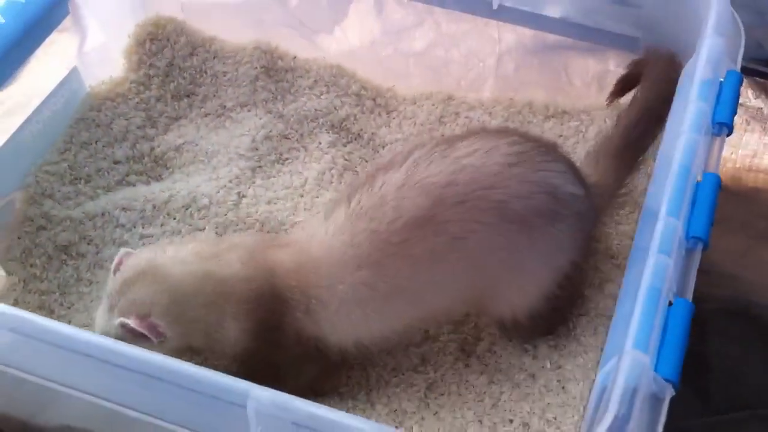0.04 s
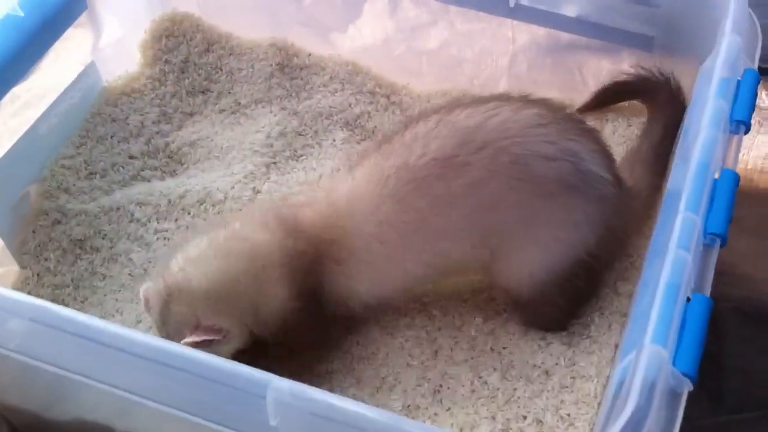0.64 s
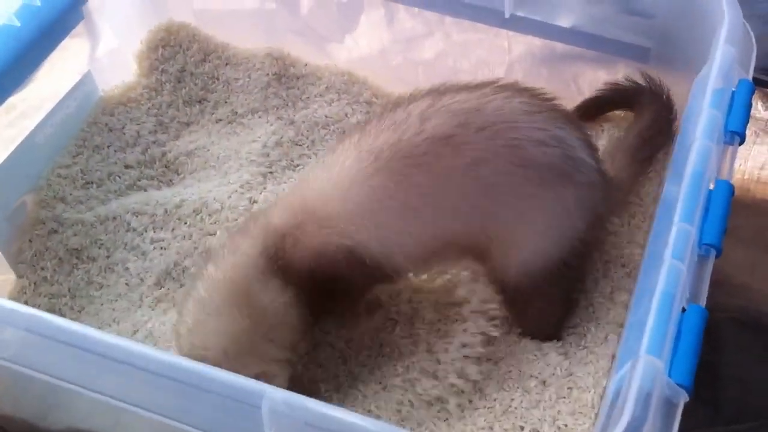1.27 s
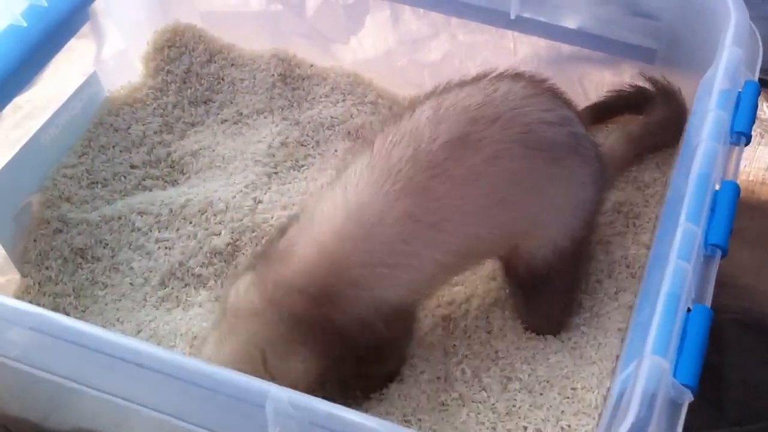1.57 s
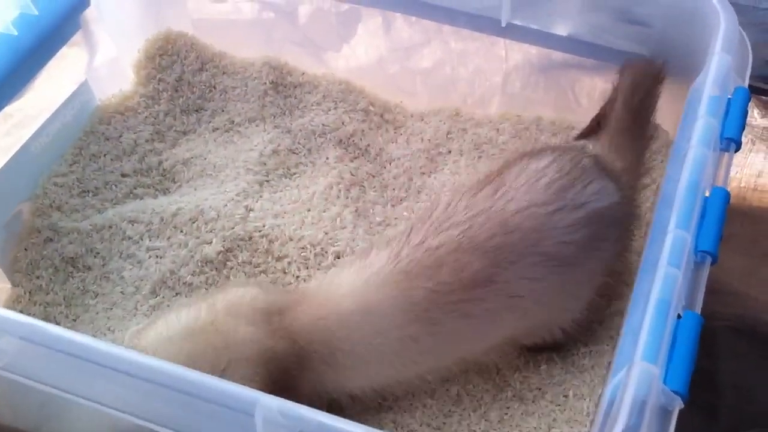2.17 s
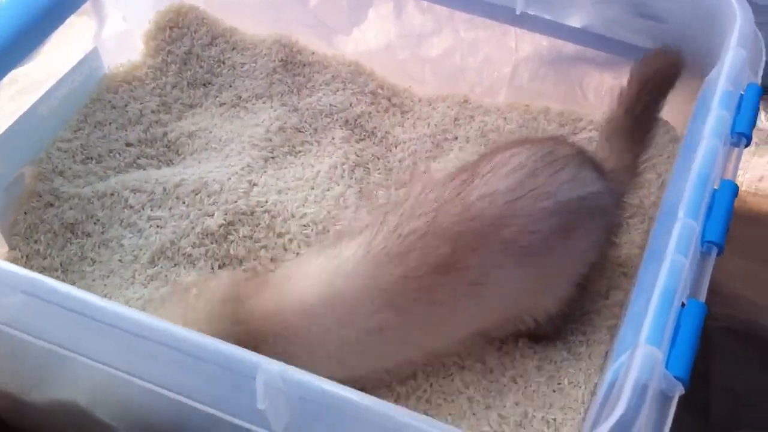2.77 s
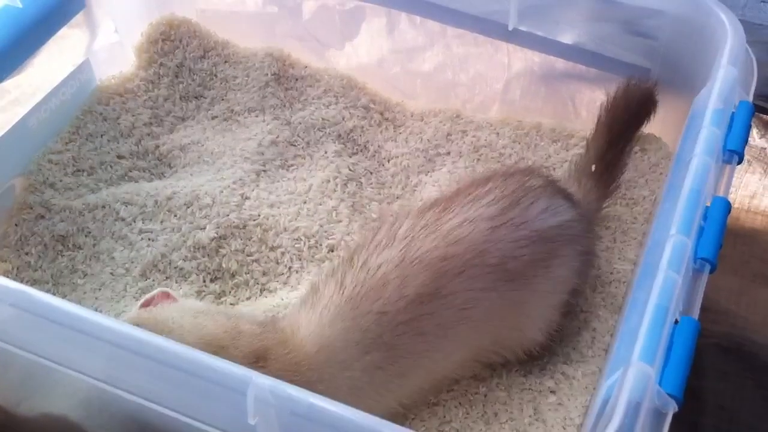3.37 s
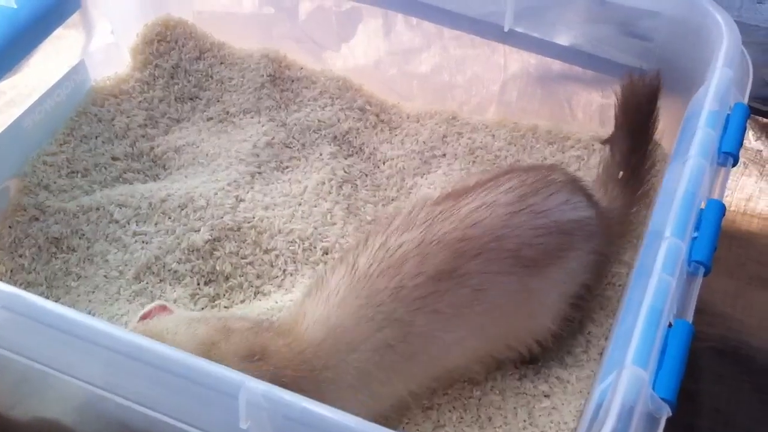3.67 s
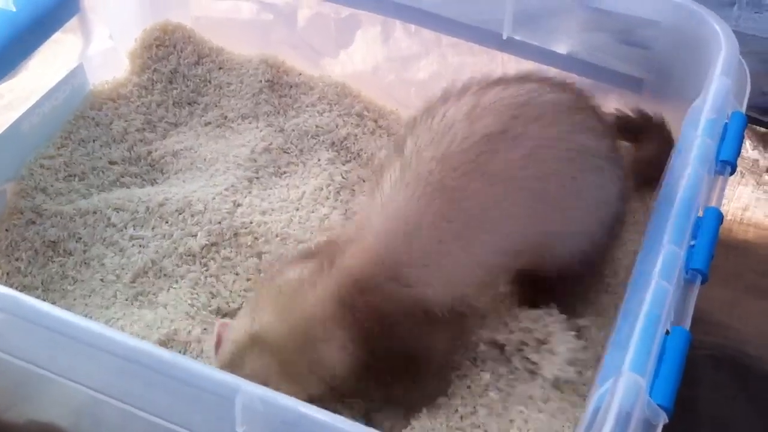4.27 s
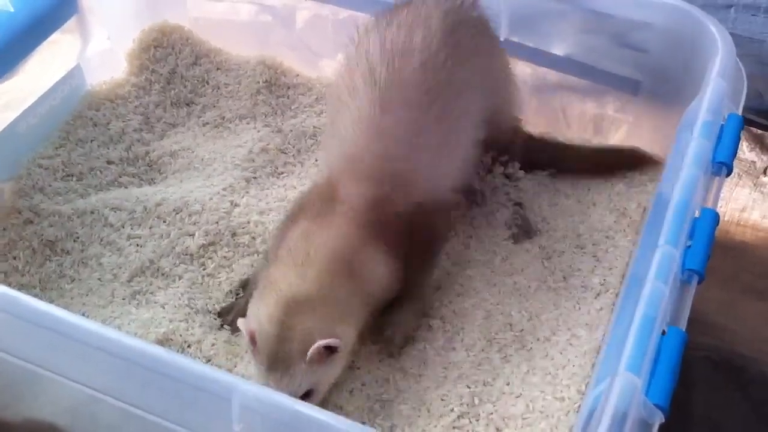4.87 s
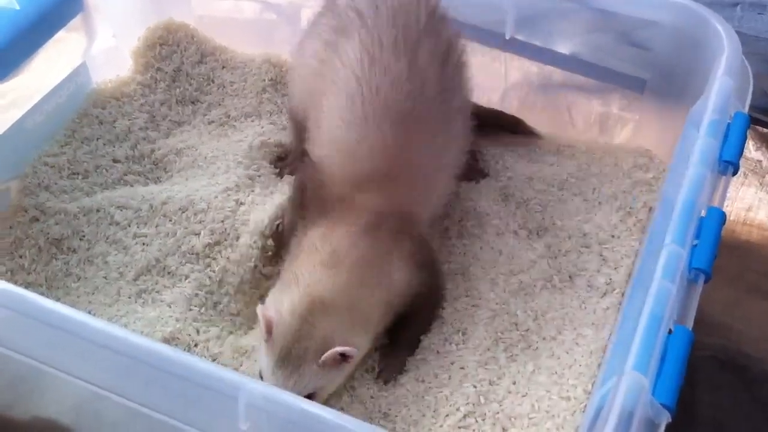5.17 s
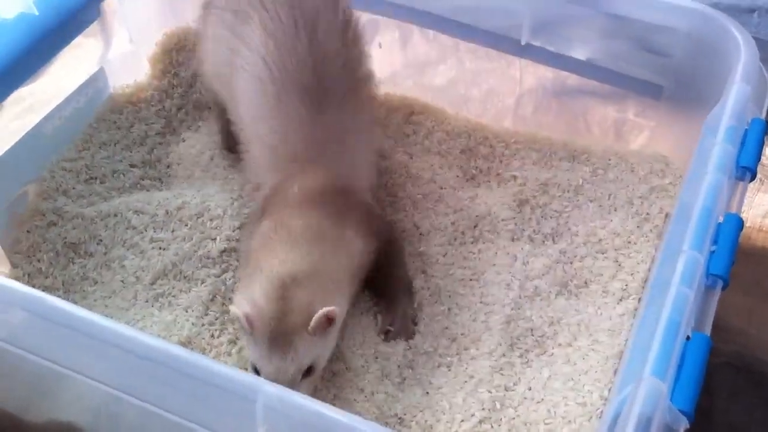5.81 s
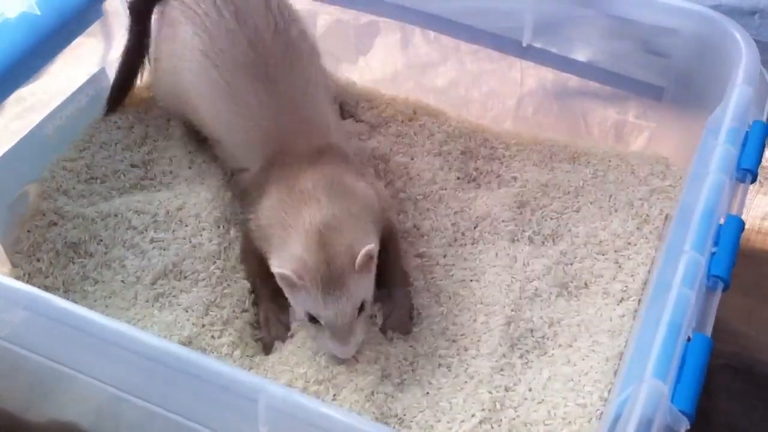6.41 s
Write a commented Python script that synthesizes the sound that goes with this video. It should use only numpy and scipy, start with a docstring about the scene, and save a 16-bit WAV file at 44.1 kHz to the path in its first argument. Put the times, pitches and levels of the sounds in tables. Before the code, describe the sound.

A ferret digs in a plastic tub of dry rice, heard up close in a small room with a faint, steady, low appliance drone. It opens with a short spatter of grains and a click on the plastic. From 0.5 to 1.8 seconds, quick, light paw strokes make a soft, fizzy rustle, with a small scatter at 1.5. Sharp ticks cluster near 1.8 seconds, then the snout shoves deeper in uneven, hollow crunches with stray ticks. At 3.2 seconds comes the loudest sound, a bright spray of rice pelting the tub wall, followed by grains pattering down and a couple of clicks. Rustling resumes at 4 seconds, with another spray near 4.5 and a few ticks. Paw strokes continue with a small scatter at 5.5, a stronger, boxier spray on the far wall at 5.9, and a last light scatter around 6.3 seconds.

```python
"""A ferret digs in a plastic tub of dry rice, close by, in a small room with a droning appliance.
Its paws stir the surface into a fine fizz and its snout churns deeper down with a hollow crunch.
Each kick flings a spray of grains against the tub's walls, and stray grains tick on the plastic.
All the rice is made of tiny collisions, coloured by the wall or the layer where they happen."""
import sys
import numpy as np
from scipy import signal
from scipy.fft import rfft, irfft
from scipy.io import wavfile

SR = 44100
rng = np.random.default_rng(int(sys.argv[2]) if len(sys.argv) > 2 else 0)


def dump_mix(stems):
    """Bounce the given channels to the path in sys.argv[1] as a 16-bit WAV at rate SR."""
    frames = np.atleast_2d(stems).T  # one column per channel
    limited = np.clip(frames, -1, 1)  # hard clip at full scale
    pcm = np.round(limited * 32767).astype(np.int16)
    wavfile.write(sys.argv[1], SR, pcm)


N = 284445

# bright tone of grains on the tub's near wall: (frequency [Hz], relative level [dB])
NEAR_WALL = [(50, -34), (180, -6.5), (500, -17.5), (780, -13.5), (1200, -14.5), (1800, 1), (2900, 0.5),
             (4000, -3.5), (5200, -5), (6400, 2), (10000, 0), (12500, 3), (15800, 2)]


def gain_of(db):
    """Decibels to amplitude."""
    return 10 ** (np.asarray(db) / 20)


def unit_rms(x):
    """Scales to rms 1."""
    return x / np.sqrt(np.mean(x ** 2) + 1e-20)


def curve_at(points, hz):
    """Reads a curve on a log-frequency axis."""
    f, value = np.transpose(points)
    return np.interp(np.log(hz + 1), np.log(f + 1), value)


def add(mix, start, sound):
    """Mixes a sound in, start seconds from the top."""
    part = mix[round(start * SR):][:len(sound)]
    part += sound[:len(part)]


def wander(hz):
    """Smooth random drift of rms 1, its speed rolling off around hz."""
    f = np.fft.rfftfreq(N, 1 / SR)
    return unit_rms(irfft(rfft(rng.standard_normal(N)) * np.exp(-(f / hz) ** 2), N))


def colour(x, spectrum, size=4096):
    """Minimum-phase EQ with the given curve, at unit energy."""
    log_gain = np.log(gain_of(curve_at(spectrum, abs(np.fft.fftfreq(size, 1 / SR)))))
    response = np.exp(np.conj(signal.hilbert(log_gain)))
    taps = np.fft.ifft(response).real[:size // 2]
    return signal.oaconvolve(x, taps / np.linalg.norm(taps))[:len(x)]


def ring(x, modes):
    """Damped modes struck by x, at unit energy: (frequency [Hz], relative level [dB], t60 [s])."""
    t = np.arange(SR // 8) / SR
    response = sum(gain_of(db - 60 * t / t60) * np.cos(2 * np.pi * hz * t) for hz, db, t60 in modes)
    return signal.oaconvolve(x, response / np.linalg.norm(response))[:len(x)]


def appliance():
    """A low drone that booms in two room modes, with a few faint, wavering tones."""
    # noise bed of the drone: (frequency [Hz], relative level [dB])
    drone_eq = [(20, -30), (48, -35), (90, -15), (125, -3), (200, -2), (270, -6), (380, -10), (460, -6.5),
                (560, -15), (900, -11.5), (1200, -19), (2100, -20.5), (3800, -30.5), (6300, -32),
                (10000, -38), (15000, -35.5)]
    # room modes that the drone keeps booming: (frequency [Hz], half width [Hz], level [dB])
    room_modes = [(140.6, 6.2, -61), (182.7, 10.4, -61.5)]
    # the appliance's tones: (frequency [Hz], relative level [dB])
    tones = [(119, -66.5), (260, -74), (292, -67.5), (947, -72.5), (1001, -73.5), (2482, -78.5),
             (4436, -82.5)]
    phase_per_hz = 2 * np.pi * np.arange(N) / SR
    drone = gain_of(-53.5) * colour(rng.standard_normal(N), drone_eq)
    for hz, width, db in room_modes:
        phase = hz * phase_per_hz
        drone += gain_of(db) * (wander(width) * np.cos(phase) + wander(width) * np.sin(phase))
    for hz, db in tones:
        tone = np.sqrt(2) * np.sin(hz * phase_per_hz + 0.51 * wander(hz=4.0))
        waver_db = 2.8 * wander(hz=2.4) - 1.5
        drone += gain_of(db + waver_db) * tone
    return drone


def collisions(per_s, spread_db, size=N):
    """Grains collide at random: clicks of uneven strength, rms 1."""
    strength = gain_of(spread_db * np.minimum(rng.exponential(1, size), 3))
    return unit_rms(strength * rng.choice([-1, 1], size) * (rng.random(size) < per_s / SR))


def rattle(clicks, decay_s, snap, spots=16, size=900):
    """Every click is a snap and a brief rattle of its neighbours, different from spot to spot."""
    t, out = np.arange(size) / SR, np.zeros(len(clicks))
    spot = rng.integers(0, spots, len(clicks))
    for k in range(spots):
        grain = rng.standard_normal(size) * (np.exp(-t / decay_s) + snap * np.exp(-t / 0.00026))
        out += signal.oaconvolve(clicks * (spot == k), grain / np.linalg.norm(grain))[:len(clicks)]
    return out


def tub_ring(x, ring_db):
    """Adds the short ring of the struck plastic."""
    # modes of the tub: (frequency [Hz], relative level [dB], t60 [s])
    tub_modes = [(1830, 4, 0.03), (1880, 1, 0.024), (2220, -11, 0.035), (2560, -6, 0.036), (3150, 2, 0.021)]
    return x + gain_of(ring_db) * ring(x, tub_modes)


def sprays(size=SR // 2):
    """A flung pawful arrives in a rush, pelts on briefly and thins out, shared between two walls."""
    # pawfuls hitting the tub: (time [s], level [dB], attack [s], hold [s], t60 [s],
    # share on the far wall [0-1], note of the struck spot [Hz], its relative level [dB])
    pawfuls = [(0.006, -33.5, 0.011, 0.012, 0.01, 0.04, 1870, -11),
               (1.513, -41, 0.003, 0.017, 0.14, 0.25, 2060, -21),
               (3.221, -21.5, 0.0086, .011, 0.32, 0, 750, -22.5),
               (4.444, -38.5, 0.0035, 0.0074, 0.24, 0.16, 2950, -8),
               (4.454, -30, .01, .013, 0.1267, 0.14, 1780, -12),
               (5.485, -39.5, 0.0046, .004, 0.18, 0.65, 2310, -15),
               (5.515, -43, 0.0019, 0.0016, 0.13, 0.3, 3030, -18),
               (5.867, -30, 0.0089, 0.004, 0.2444, 0.97, 2560, -14),
               (6.280, -42.5, 0.0037, 0.037, 0.18, 0.4, 2300, -13),
               (6.301, -42.5, 0.0057, 0.0037, 0.14, 0.3, 3520, -5)]
    # boxier tone of the far wall: (frequency [Hz], relative level [dB])
    far_wall = [(50, -24), (250, -1), (500, -1), (720, 5.5), (950, -4), (1500, 3.5), (2500, -0.5),
                (4000, -1), (8000, -0.5), (12000, -3.5), (15800, 0.5)]
    t, out = np.arange(size) / SR, np.zeros(N)
    for start, db, attack, hold, t60, far_share, spot_hz, spot_db in pawfuls:
        rush = np.minimum(t / attack, 1) * gain_of(-60 * np.maximum(t - attack - hold, 0) / t60)
        per_s = 4500 * gain_of(db + 40) ** 0.7  # a louder pawful holds more grains
        near, far, spot, push = (
            rattle(rush * collisions(per_s, spread_db=1.5, size=size), decay_s=0.0011, snap=3.6)
            for _ in range(4))
        walls = np.sqrt(1 - far_share) * tub_ring(colour(near, NEAR_WALL), ring_db=-20.5)
        walls += np.sqrt(far_share) * colour(far, far_wall)
        ping = gain_of(spot_db) * ring(spot, [(spot_hz, 0, 0.014)])
        thump = gain_of(-72 + 9 * far_share) * ring(push, [(48, 0, 0.049)])  # the whole tub gives a little
        add(out, start, gain_of(db) * (walls + ping) + thump)
    return out


def ticks():
    """Single grains and claws make hard, lone contacts with the near wall."""
    # hits on the plastic: (time [s], relative level [dB])
    hits = [(0.0106, -16), (0.067, -30), (0.116, -35), (1.82, -17), (1.8353, -24), (1.8374, -16),
            (1.848, -27), (1.862, -27), (1.9404, -26.5), (2.093, -30), (2.462, -32), (2.802, -34),
            (3.099, -31), (3.455, -22.5), (3.475, -24), (3.571, -38), (4.017, -37.5), (4.551, -27),
            (4.576, -38), (4.589, -28), (4.749, -31.5)]
    clicks = np.zeros(N)
    for start, db in hits:
        clicks[round(start * SR)] += gain_of(db)
    contacts = rattle(clicks, decay_s=0.0028, snap=1.5)
    return gain_of(4.5) * tub_ring(colour(contacts, NEAR_WALL), ring_db=-16.5)


def settling(power, trickle_db=-15, decay_s=0.035):
    """Turns flow power into an amplitude envelope; loosened grains trickle on after each move."""
    pole = np.exp(-1 / (decay_s * SR))
    trickle = signal.lfilter([1 - pole], [1, -pole], power)
    return np.sqrt(power + gain_of(trickle_db) ** 2 * trickle)


def rice_flow(attack_s=0.0046, stop_t60=0.12):
    """Envelopes of the top and deep rice: a stroke is a smooth arch, a surge starts and stops fast."""
    # light paw strokes over the surface: (time [s], length [s], relative level [dB])
    strokes = [(0.5, 0.11, -67), (0.554, 0.1, -61), (0.647, 0.17, -63.5), (0.827, 0.092, -63),
               (0.936, 0.083, -61.5), (1.043, 0.1, -61), (1.177, 0.11, -61), (1.298, 0.16, -60.5),
               (1.43, 0.18, -61), (1.646, 0.2, -64), (4.05, 0.13, -61), (4.267, 0.18, -63),
               (4.392, 0.062, -61), (4.687, 0.24, -61), (4.876, 0.13, -55.5), (4.958, 0.28, -59.5),
               (5.246, 0.25, -62), (5.388, .15, -59.5), (5.61, 0.34, -66), (5.762, .09, -58.5),
               (6.056, 0.19, -59), (6.157, 0.11, -61.5), (6.393, .06, -64.5)]
    # shoves into the rice, and flung grains pattering back down after the biggest spray:
    # (time [s], length [s], relative end level [dB], swell on the way [dB], fizz over crunch [dB])
    surges = [(0.028, .04, -62.5, -13, 6.5), (1.877, 0.032, -54, 1, 0), (1.964, 0.069, -55, 1, -4.5),
              (2.083, 0.08, -64, -9.5, 0.5), (2.188, 0.12, -51, 6.5, -3), (2.334, 0.11, -63.5, 1, -0.5),
              (2.479, 0.12, -53, -0.5, -3.5), (2.63, 0.099, -63, 1, -1), (2.798, 0.0075, -51.5, -3, -4),
              (2.84, 0.24, -59, -6, -4), (3.094, .005, -54.5, 2, 1.5), (3.119, 0.089, -49.5, 8.5, 2.5),
              (3.347, 0.11, -54, -0.5, 5), (3.975, 0.056, -58, 3.5, -0.5), (4.253, .015, -62, 1, -5),
              (4.541, 0.053, -61, 4, 4), (5.973, 0.078, -57, -1.5, 3.5), (6.232, 0.018, -54.5, -4, 4)]
    t, top, deep = np.arange(SR) / SR, np.zeros(N), np.zeros(N)
    for start, length, db in strokes:
        arch = gain_of(db) * np.sin(np.pi * np.minimum(t / length, 1) ** 0.64)  # peaks a little early
        add(top, start, arch ** 2)
        add(deep, start, (arch * gain_of(-12.5)) ** 2)  # barely reaches the deeper rice
    for start, length, db, swell_db, fizz_db in surges:
        surge_db = db - swell_db * np.maximum(1 - t / length, 0)
        release_db = -60 * np.maximum(t - length, 0) / stop_t60
        surge = np.minimum(t / attack_s, 1) * gain_of(surge_db + release_db)
        add(deep, start, surge ** 2)
        add(top, start, (surge * gain_of(fizz_db)) ** 2)
    return settling(top), settling(deep)


def stirring():
    """Grains slide over one another in clumps: a fine fizz on top, a hollow crunch below."""
    # crisp tone of the surface grains: (frequency [Hz], relative level [dB])
    surface_eq = [(500, -18), (2000, -4), (4500, -7), (6500, 1), (8900, 1), (10800, -0.5), (12700, 2),
                  (15800, 0)]
    # muffled tone of the buried grains: (frequency [Hz], relative level [dB])
    depth_eq = [(200, -14.5), (800, -2.5), (1300, -8.5), (2000, -1.5), (3000, -3.5), (3800, -10),
                (5500, -8), (15000, -25)]
    # the hollow the snout makes between rice and wall: (frequency [Hz], relative level [dB], t60 [s])
    hollow_modes = [(2330, -2.5, 0.0079), (2850, 0, 0.012), (3260, -9, 0.0089)]
    top_flow, deep_flow = rice_flow()
    clumps = gain_of(1.2 * wander(hz=70))
    top = rattle(collisions(per_s=4000, spread_db=-1.5), decay_s=0.0012, snap=1.6) * top_flow * clumps
    deep = rattle(collisions(per_s=1100, spread_db=2.5), decay_s=0.0028, snap=0.71) * deep_flow * clumps
    fizz = gain_of(1.3) * colour(top, surface_eq)
    crunch = gain_of(-2.5) * colour(deep, depth_eq)
    hollow = gain_of(-5.0) * ring(deep, hollow_modes)
    return fizz + crunch + hollow


def room(x, predelay_s=0.004):
    """Dense reflections from close walls, the treble dying first."""
    # decay of the small room: (frequency [Hz], t60 [s])
    decay_times = [(200, 0.67), (2000, 0.38), (6000, 0.18), (15000, 0.17)]
    reflections = rng.standard_normal(SR // 2) * (np.arange(SR // 2) > predelay_s * SR)
    hz, t, bands = signal.stft(reflections, SR, nperseg=256)
    fade = gain_of(-60 * t / curve_at(decay_times, hz)[:, None])
    tail = signal.istft(bands * fade, SR, nperseg=256)[1]
    return signal.oaconvolve(x, tail / np.linalg.norm(tail))[:N]


def scene():
    """Close rice with a touch of room, over the appliance's drone, in mono."""
    rice = sprays() + ticks() + stirring()
    return (rice + gain_of(-14.5) * room(rice) + appliance())[None]


def record(dry):
    """A steep low-pass trims the air above 16 kHz."""
    lowpass = signal.firwin(511, 16000, window=("kaiser", 9), fs=SR)
    return signal.oaconvolve(dry, lowpass[None], "same")


dry = scene()
out = record(dry)
dump_mix(out)
```